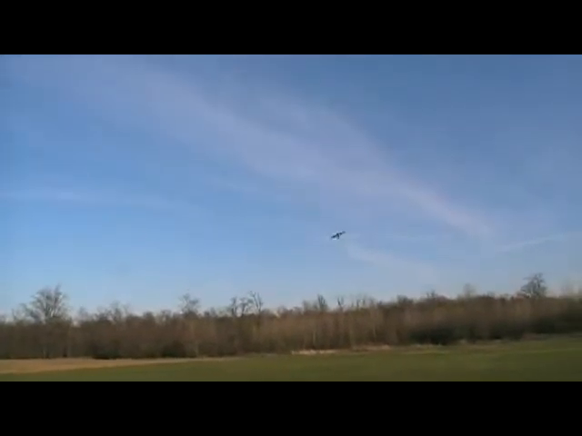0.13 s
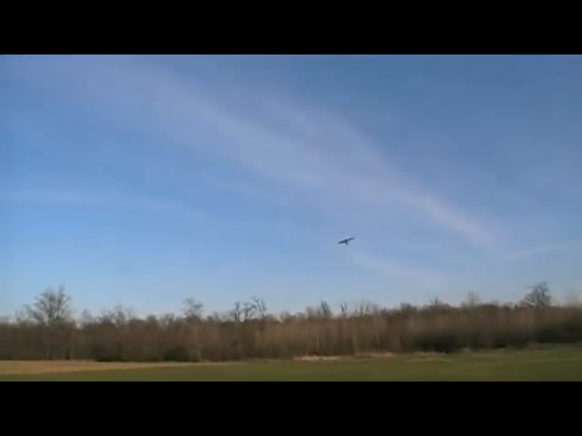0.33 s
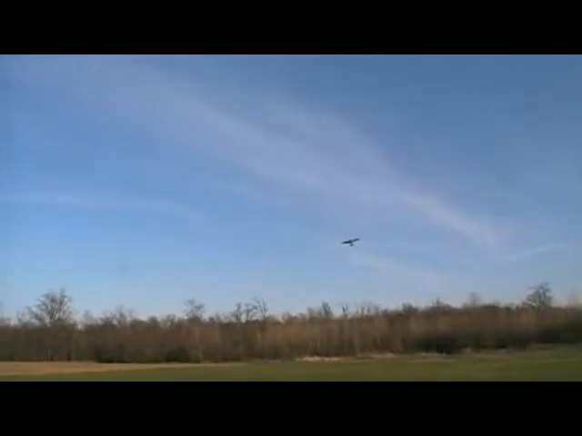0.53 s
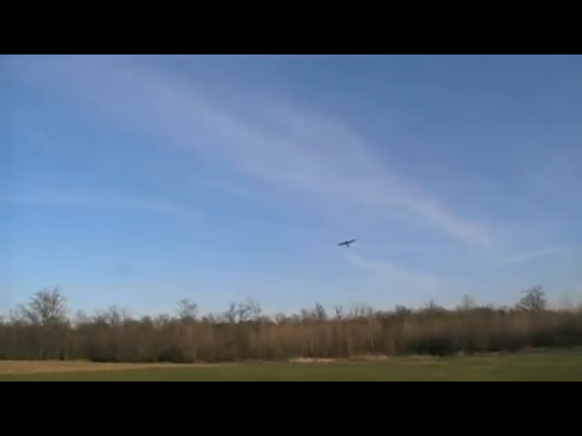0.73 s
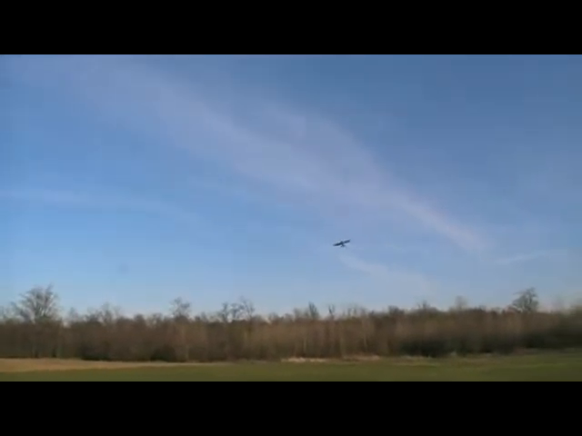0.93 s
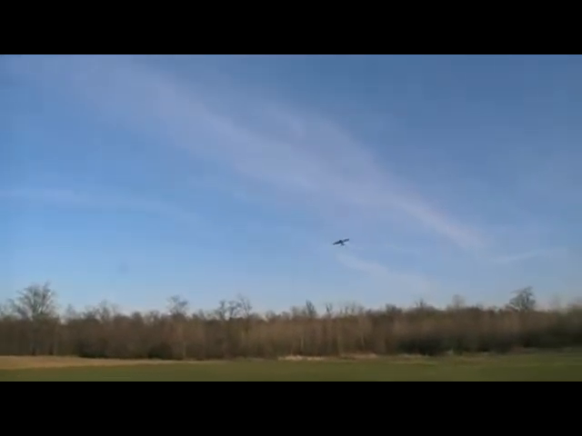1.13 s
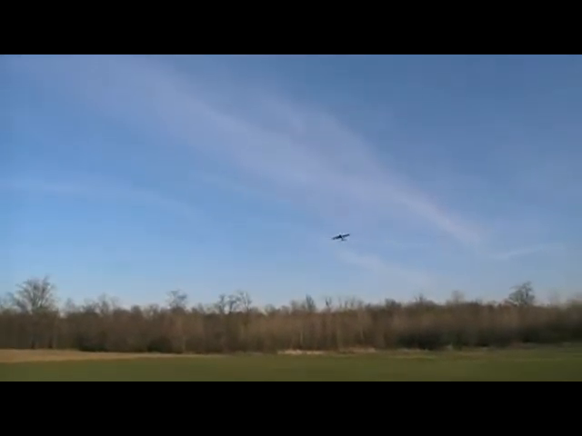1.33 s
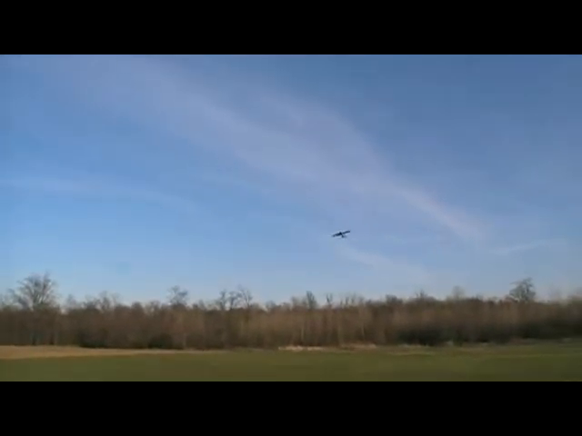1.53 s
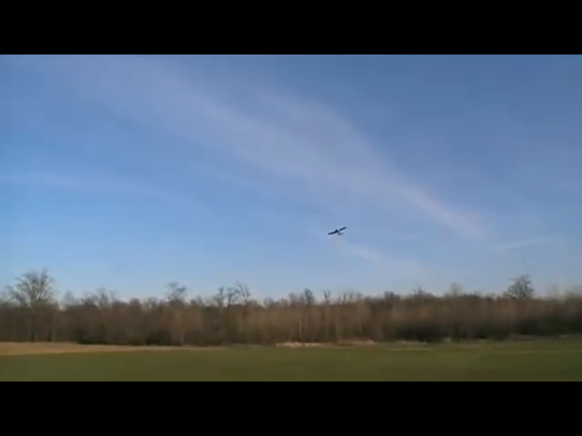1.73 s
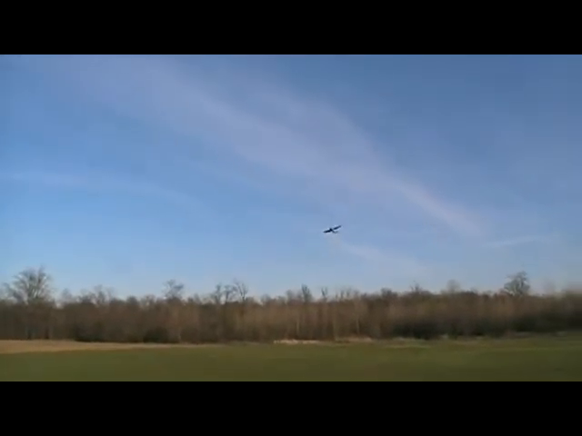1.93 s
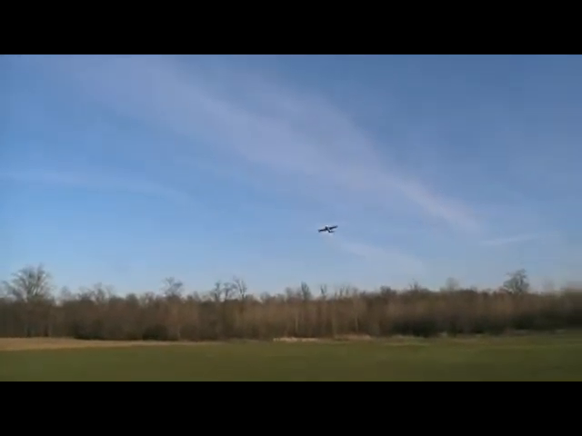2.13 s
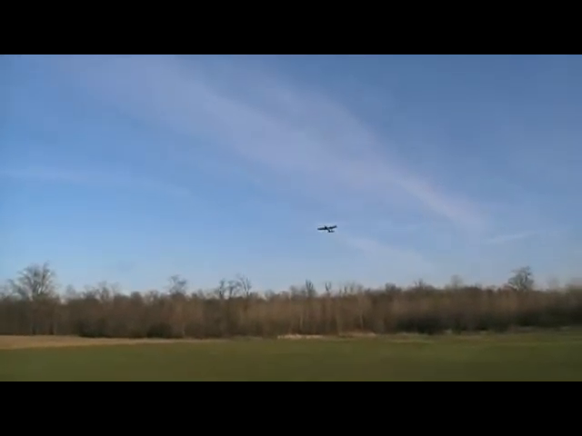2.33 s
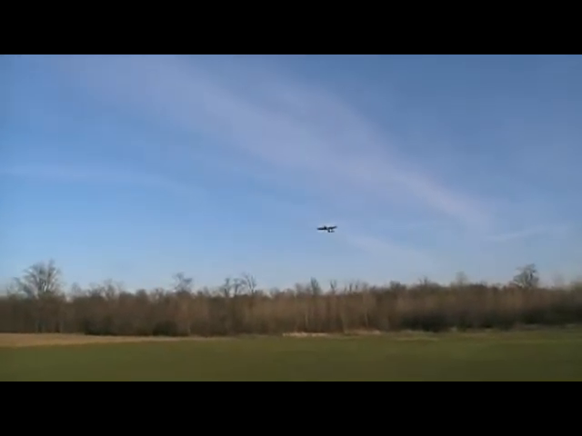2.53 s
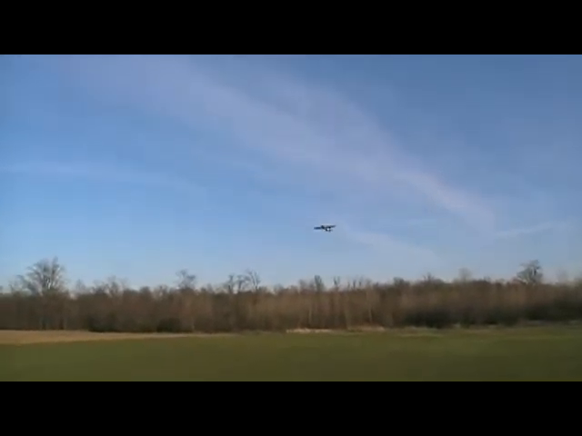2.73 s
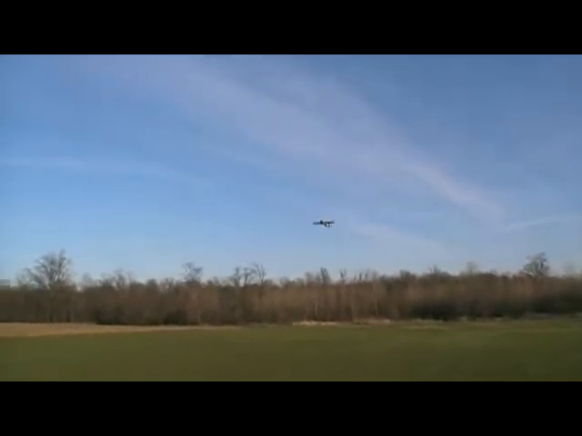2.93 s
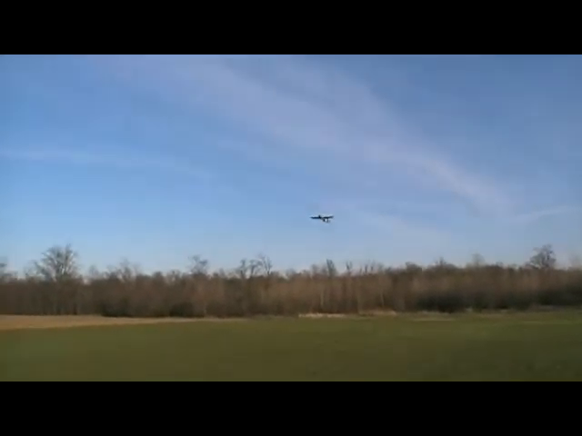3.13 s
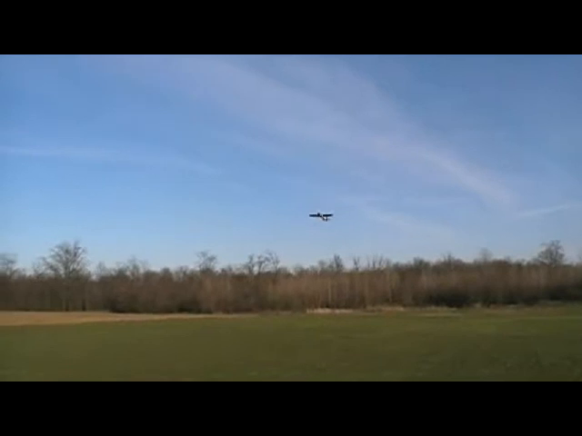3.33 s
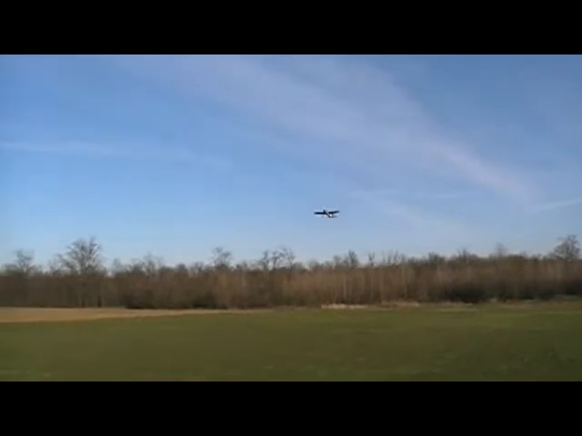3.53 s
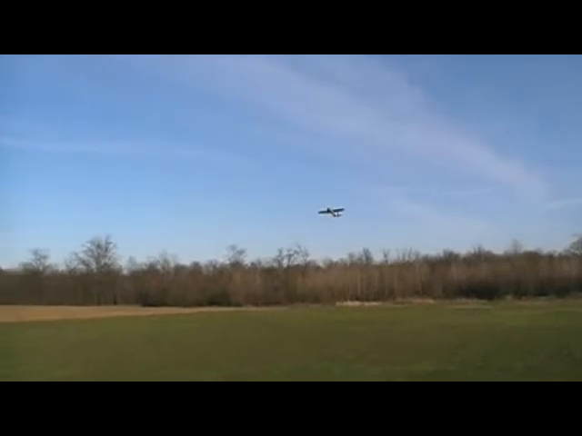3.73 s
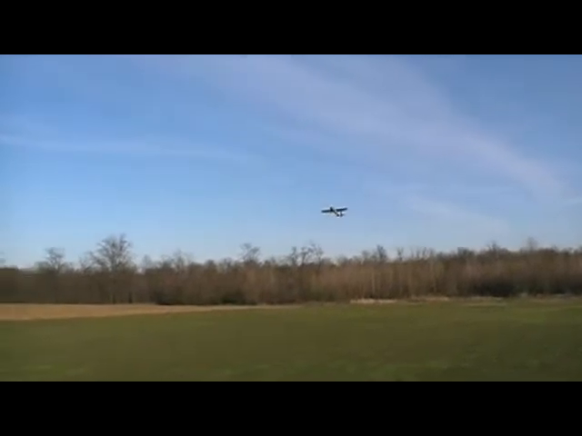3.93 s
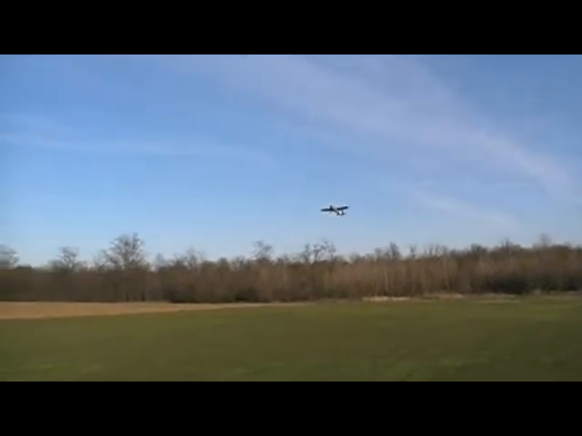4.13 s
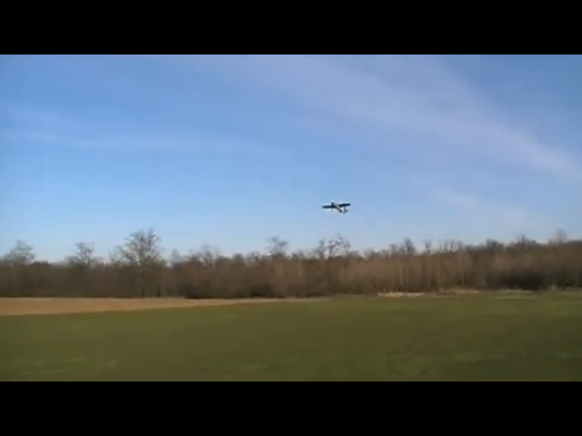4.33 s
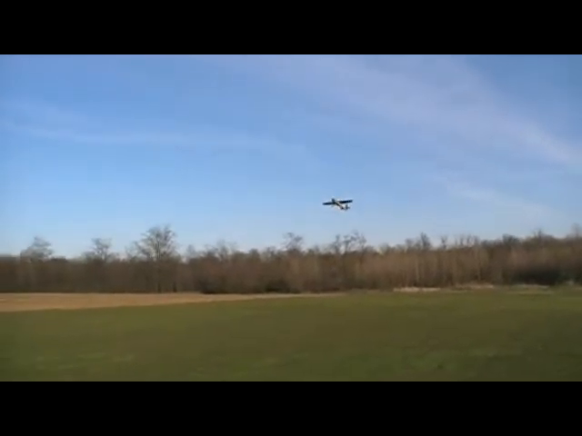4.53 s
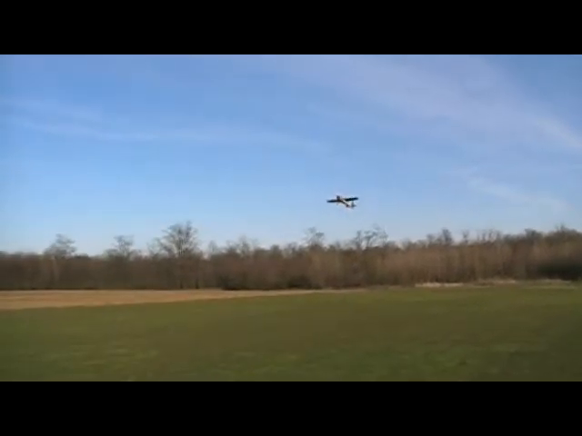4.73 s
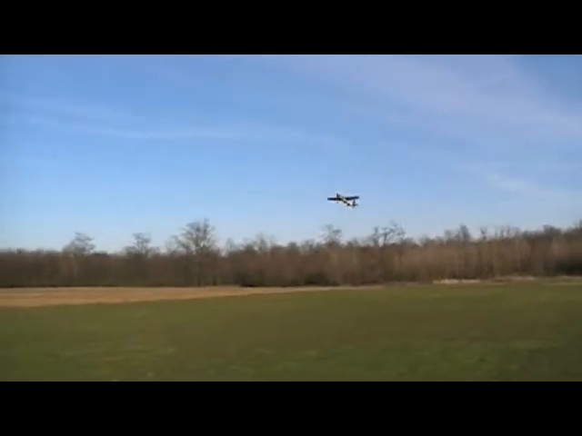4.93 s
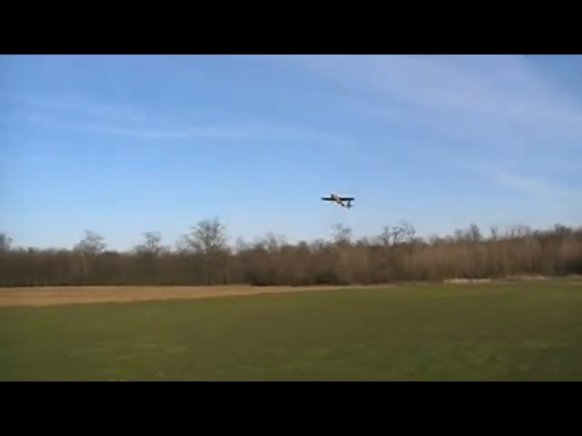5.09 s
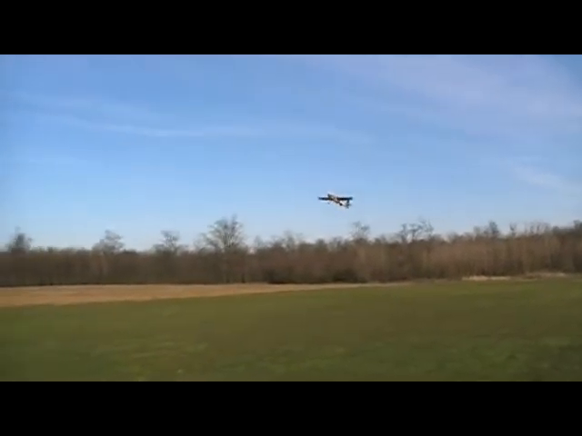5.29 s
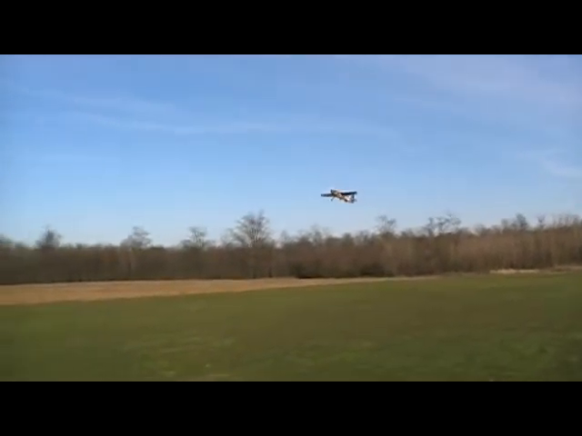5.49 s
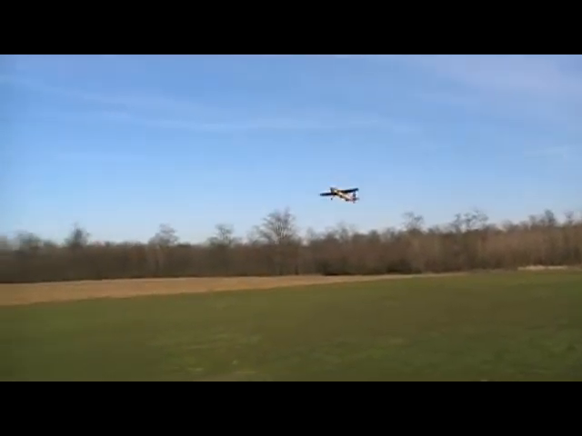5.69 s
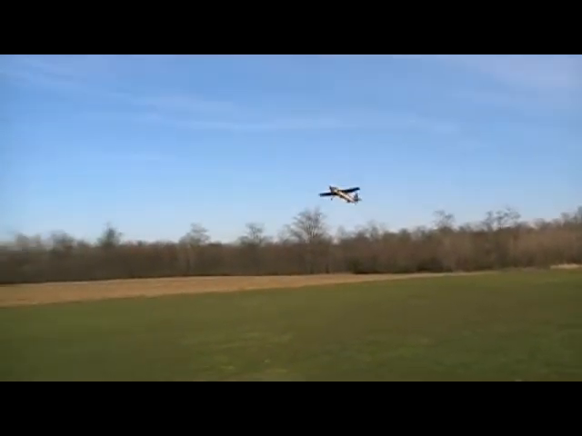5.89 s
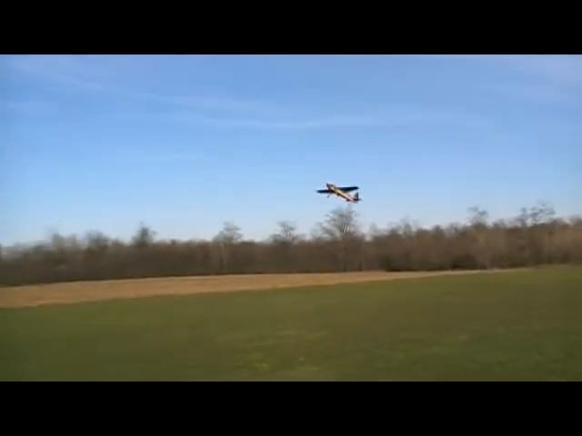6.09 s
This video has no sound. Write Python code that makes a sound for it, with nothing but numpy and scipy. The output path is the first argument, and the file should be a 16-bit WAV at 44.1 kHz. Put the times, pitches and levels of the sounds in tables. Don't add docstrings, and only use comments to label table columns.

```python
import sys
import numpy as np
from scipy import signal
from scipy.fft import rfft, irfft, next_fast_len
from scipy.io import wavfile
from scipy.ndimage import uniform_filter1d, map_coordinates

SR = 44100
rng = np.random.default_rng(int(sys.argv[2]) if len(sys.argv) > 2 else 0)


def pcm_store(signal):
    levels = np.round(np.clip(np.atleast_2d(signal), -1, 1) * 32767)
    wavfile.write(sys.argv[1], SR, levels.astype(np.int16).T)


def how_loud(loudness_db):
    steps = np.asarray(loudness_db, float) / 20
    return 10 ** steps


N = 271215
SLIP_TURN = 134
MEAN_SPEED = 65
NEAR_M = 40
# [time_s, speed_turns_per_s]
ENGINE_SPEED = [(0.0, 73.39), (0.34, 71.14), (0.7, 59.61), (1.03, 57.87), (1.35, 65.95), (1.99, 67.52),
                (2.15, 60.03), (2.4, 54.33), (2.84, 67.66), (3.14, 70.77), (3.34, 65.26), (3.94, 65.71),
                (4.17, 59.86), (4.49, 56.99), (4.92, 60.66), (5.35, 70.36), (5.72, 71.04), (6.15, 65.09)]
# [time_s, distance_m]
PLANE_DISTANCE = [(0, 70), (.75, 68.2), (1.7, 56), (2.4, 65), (2.8, 49.3), (3.4, 41.7), (4.2, 37.8),
                  (5.5, 26.5), (6.15, 27.5)]


def rms_one(x):
    return x / np.sqrt(np.mean(x ** 2) + 1e-20)


def in_time(rows):
    times_s, values = np.transpose(rows)
    return np.interp(np.arange(N) / SR, times_s, values)


def law(near_db, per_m=0, per_speed=0):
    further_m = in_time(PLANE_DISTANCE) - NEAR_M
    faster = in_time(ENGINE_SPEED) - MEAN_SPEED
    return near_db + per_m * further_m + per_speed * faster


def colour(x, points):
    hz, db = np.transpose(points)
    size = next_fast_len(N)
    log_hz = np.log(np.arange(size // 2 + 1) * SR / size + 1)
    gain = how_loud(np.interp(log_hz, np.log(hz), db))
    return irfft(rfft(x, size) * gain, size)[..., :N]


def noise_of(curve):
    return colour(rng.standard_normal(N), curve)


def drift(hz):
    low_pass = signal.butter(2, hz, fs=SR, output="sos")
    return rms_one(signal.sosfilt(low_pass, rng.standard_normal(N + SR))[SR:])


def resonance(x, hz, width_hz):
    r = np.exp(-np.pi * width_hz / SR)
    feedback = [2, -4 * r * np.cos(2 * np.pi * hz / SR), 2 * r * r]
    return signal.lfilter([1 - r * r, 0, r * r - 1], feedback, x + 1e-18)


def tones(table, angle, waver_db):
    out = 0
    for order, db, phase in table:
        level = how_loud(db + waver_db * drift(3.0))
        out = out + level * np.cos(order * angle + phase + 0.26 * drift(25.0))
    return out


def crank():
    first_turn = -1.44
    flywheel_s = .1
    lead = SR // 5
    now = np.arange(-lead, N + lead) / SR
    speed = np.interp(now, *np.transpose(ENGINE_SPEED))
    counted = np.cumsum(uniform_filter1d(speed, size=int(flywheel_s * SR))) / SR
    turns = np.arange(-8, 401)
    return turns, np.interp(turns, counted - counted[lead] + first_turn, now)


def strokes(turns, turn_s, dice, spread_db):
    # [centre_s, half_length_s, level_db against a full firing]
    catches = [
        (2.075, .02, -6),
        (2.405, .05, -3),
        (2.475, .03, -7),
        (2.555, .06, -2),
        (5.05, .3, -13),
    ]
    idle_db, catch_fall_db = -22, 7
    fires = (turns + (turns > SLIP_TURN - 1)) % 2 == 0
    caught_db = [db - catch_fall_db * ((turn_s - centre) / half) ** 2 for centre, half, db in catches]
    idle_turn_db = np.maximum(idle_db, np.max(caught_db, axis=0))
    level_db = np.where(fires, 0, idle_turn_db) + spread_db * dice
    at = np.round(turn_s * SR).astype(int)
    heard = (at >= 0) & (at < N)
    clicks = np.zeros(N)
    clicks[at[heard]] = how_loud(level_db[heard])
    return clicks


def exhaust(turns, turn_s):
    # [pitch_hz, width_hz, level_db]
    pipe = [
        (312.2, 107, -3),
        (491, 203, 0.5),
        (2450, 590, -15.5),
        (1520, 140, -17.5),
    ]
    muffler_hz, muffler_width_hz, muffler_share = 261, 53, 0.52
    dice = rng.standard_normal((len(turns), len(pipe) + 1))
    out = 0
    for k, (hz, width_hz, db) in enumerate(pipe):
        chance = .7 * dice[:, -1] + hz / 1100 * dice[:, k]
        kicks = strokes(turns, turn_s - .00021, chance, spread_db=1)
        out = out + (-1) ** k * how_loud(db) * resonance(kicks, hz, width_hz)
    out = out - muffler_share * resonance(out, muffler_hz, muffler_width_hz)
    soft = signal.lfilter(*signal.butter(2, 2150, fs=SR), out)
    return rms_one(signal.lfilter(*signal.butter(1, 100, "high", fs=SR), soft))


def spit(turns, turn_s):
    # [pitch_hz, level_db]
    gas_curve = [(600, -54), (1200, 3.5), (2300, 4.5), (3700, 2.5), (5000, -5.5), (6600, 2), (8000, -3),
                 (12500, -15), (15000, -24), (16500, -55)]
    rise_s, fall_s, tail_s, tail_db = 0.00042, 0.0015, 0.0041, -13.5
    kicks = strokes(turns, turn_s, rng.standard_normal(len(turns)), spread_db=.6)
    rise, fall, tail = np.exp(-1 / (np.array([rise_s, fall_s, tail_s]) * SR))
    burst = signal.lfilter([1], [1, -fall], kicks)
    gate = burst + how_loud(tail_db) * signal.lfilter([1], [1, -tail], kicks)
    return rms_one(signal.lfilter([1 - rise], [1, -rise], gate) * noise_of(gas_curve))


def wash(angle):
    # [pitch_hz, level_db]
    wash_curve = [(100, -76), (270, -11), (330, 0.5), (520, -2.5), (750, 0), (1200, -5.5), (2200, -8),
                  (3500, -22.5), (7000, -39), (16500, -75)]
    blades_db = 2.0 * np.cos(2 * angle + 0.53)
    turn_db = 2.53 * np.cos(angle + 1.28)
    return rms_one(how_loud(blades_db + turn_db + 0.68 * drift(66.0)) * noise_of(wash_curve))


def whine(turns, turn_s):
    # [multiple_of_turn_rate, level_db, phase_rad]
    shaft = [
        (8, 2, 4),
        (6.5, -4.5, 1.2),
        (16, -13.5, -0.5),
    ]
    # [multiple_of_turn_rate, level_db, phase_rad]
    throb_tones = [
        (1, -27, 0.0096),
        (2, -14, 0.68),
        (2.5, -10.5, 1),
        (3, -14, -0.25),
        (3.5, -9, 0.22),
    ]
    body_hz, body_width_hz = 187.4, 53
    now = np.arange(N) / SR
    late = 2 * np.pi * np.interp(now - .0016, turn_s, turns)
    fired = 2 * np.pi * np.interp(now, turn_s, turns + (turns > SLIP_TURN - 1))
    throb = resonance(tones(throb_tones, fired, waver_db=1.5), body_hz, body_width_hz)
    intake = how_loud(4.7 * np.cos(late - 2.6)) * tones(shaft, late, waver_db=2.5)
    return intake + how_loud(law(3.0, per_m=-0.17)) * throb


def hiss():
    # [pitch_hz, level_db]
    tip_curve = [(1500, -23), (3000, 0), (6500, -1), (10000, -3), (12500, -18), (15000, -26), (16500, -52)]
    level_db = law(-18.5, per_m=-.21, per_speed=0.0088) + 1.7 * drift(45.0)
    return how_loud(level_db) * rms_one(noise_of(tip_curve))


def air(x):
    # [pitch_hz, level_db]
    absorbed = [(4000, -33), (8000, -7), (12000, -1), (15000, 0)]
    treble_db = np.minimum(law(-1.9, per_m=-.24, per_speed=0.0064), 0)
    return x - (1 - how_loud(treble_db)) * colour(x, absorbed)


def ground(x):
    # [time_s, angle_degrees]
    elevation = [(0, 11.17), (1.1, 11.52), (2.4, 11.14), (3.2, 10.16), (3.75, 9.76), (4.4, 9.96),
                 (5.65, 10.36), (5.9, 10.77)]
    mic_height_m, sound_m_per_s = 1.6, 343
    extra_s = 2 * mic_height_m * np.sin(np.radians(in_time(elevation))) / sound_m_per_s
    late = map_coordinates(x, [np.arange(N) - extra_s * SR], order=3)
    held = signal.lfilter(*signal.butter(1, 900, fs=SR), late)
    share = np.minimum(0.586, 0.55 + 0.002 * (in_time(PLANE_DISTANCE) - NEAR_M))
    return x + share * (0.52 * late + 0.54 * held)


def wind():
    # [pitch_hz, level_db]
    rumble_curve = [(20, -34), (45, -26), (62, -5.5), (74, 2), (88, -3.5), (120, -13), (270, -18.5),
                    (400, -95)]
    # [start_s, length_s, level_db]
    gust_list = [(0.025, 0.032, -60), (0.105, 0.035, -54), (0.423, 0.036, -52), (0.484, 0.1, -64),
                 (0.618, 0.032, -60), (0.74, 0.026, -60), (0.905, 0.049, -51), (1.308, 0.096, -52),
                 (1.482, 0.062, -64), (1.685, 0.026, -56), (1.772, 0.033, -54), (2.13, 0.088, -56),
                 (2.254, 0.042, -53), (2.785, 0.13, -51), (3.118, 0.079, -69), (3.274, 0.037, -63),
                 (3.335, 0.099, -47), (3.525, 0.035, -55), (3.649, 0.034, -56), (3.95, 0.057, -49),
                 (4.048, 0.038, -53), (4.223, 0.042, -54), (4.467, 0.03, -61), (4.65, 0.042, -54),
                 (4.72, 0.14, -49), (5.153, 0.036, -56), (5.467, 0.054, -54), (5.662, 0.03, -55)]
    breeze_db, flutter_db, edge_s, lumpiness = -55, 2.1, 0.027, .4
    now = np.arange(N) / SR
    gusts = 0
    for start_s, length_s, db in gust_list:
        from_middle = (now - start_s - length_s / 2) / (length_s / 2 + edge_s)
        gusts = gusts + how_loud(db) * np.exp(-from_middle ** 2)
    noise = rms_one(noise_of(rumble_curve))
    lumps = uniform_filter1d(noise ** 2, size=SR // 25) + .01
    evened = rms_one(noise / lumps ** ((1 - lumpiness) / 2))
    return (how_loud(breeze_db + flutter_db * drift(9.1)) + gusts) * evened


def scatter(x):
    # [pitch_hz, level_db under the common sound]
    stray_curve = [(25, -16), (60, -16), (300, -24.5), (700, -20.5), (1400, -14.5), (3000, -11),
                   (7000, -11.5), (10000, -5.5), (15000, -2.5)]
    flutter_hz = 120
    return colour(np.array([x * drift(flutter_hz), x * drift(flutter_hz)]), stray_curve)


def scene():
    turns, turn_s = crank()
    angle = 2 * np.pi * np.interp(np.arange(N) / SR, turn_s, turns)
    plane = exhaust(turns, turn_s)
    plane = plane + how_loud(law(-8, per_m=-0.14, per_speed=0.056)) * spit(turns, turn_s)
    plane = plane + how_loud(law(-5.5, per_m=0.008, per_speed=-0.067)) * wash(angle)
    plane = plane + how_loud(law(-11.5, per_m=0.022, per_speed=-0.023)) * whine(turns, turn_s)
    plane = plane + hiss()
    spreading = NEAR_M / in_time(PLANE_DISTANCE)
    common = how_loud(law(-26, per_speed=0.06)) * spreading * ground(air(plane)) + wind()
    return common + scatter(common)


def band_limit(x):
    return signal.sosfilt(signal.butter(12, 16510, fs=SR, output="sos"), x)


def record(dry):
    # [pitch_hz, difference_db]
    mic_balance = [(60, -2.5), (110, -3.0), (200, -2.5), (380, -3.0), (700, -3.0), (1290, -2.0),
                   (2380, -2.0), (4400, -4.5), (8120, -1.0), (15000, -1.0)]
    limit, cut_hz = 1.3, 15800
    left = colour(dry[0], [(hz, db / 2) for hz, db in mic_balance])
    right = colour(dry[1], [(hz, -db / 2) for hz, db in mic_balance])
    rounded = limit * np.tanh(np.array([left, right]) / limit)
    top_cut = signal.cheby2(8, 50, cut_hz + 900, fs=SR, output="sos")
    return band_limit(signal.sosfilt(top_cut, rounded))


dry = scene()
out = record(dry)
pcm_store(out)
```